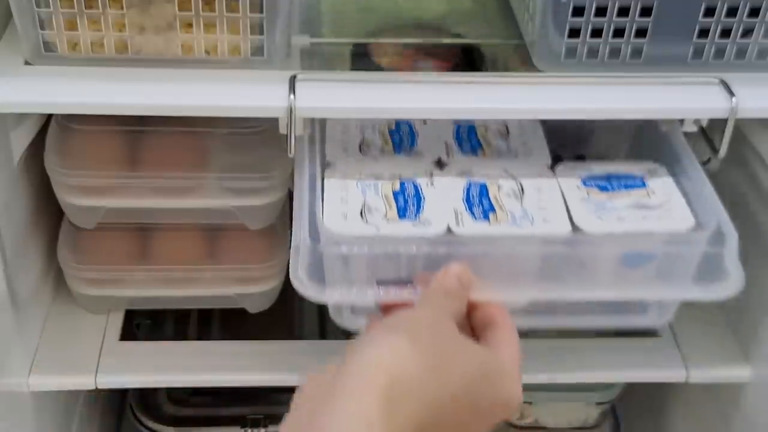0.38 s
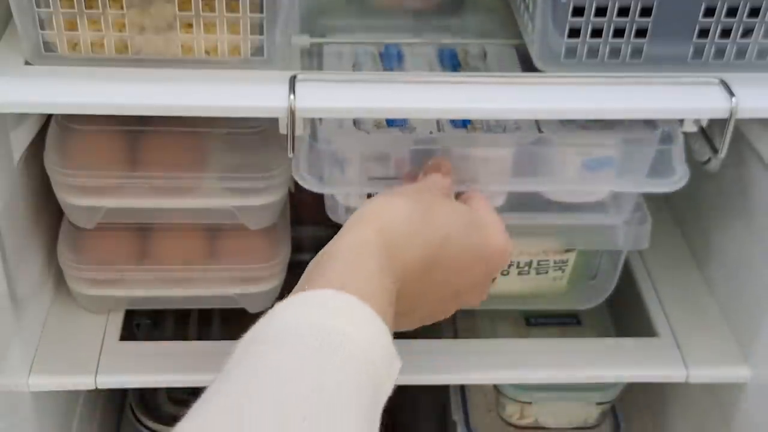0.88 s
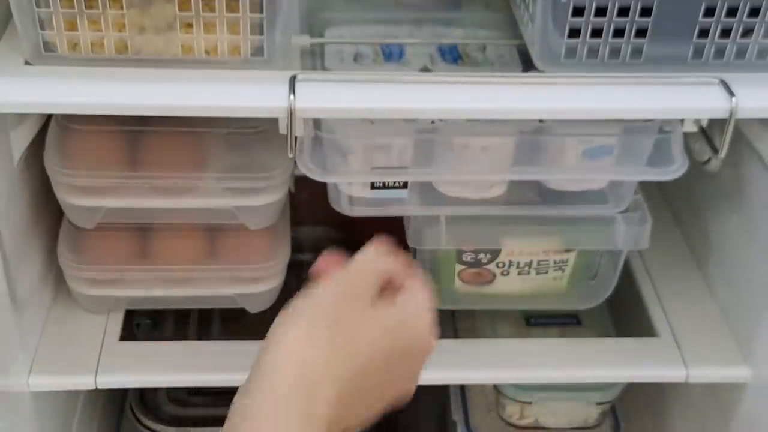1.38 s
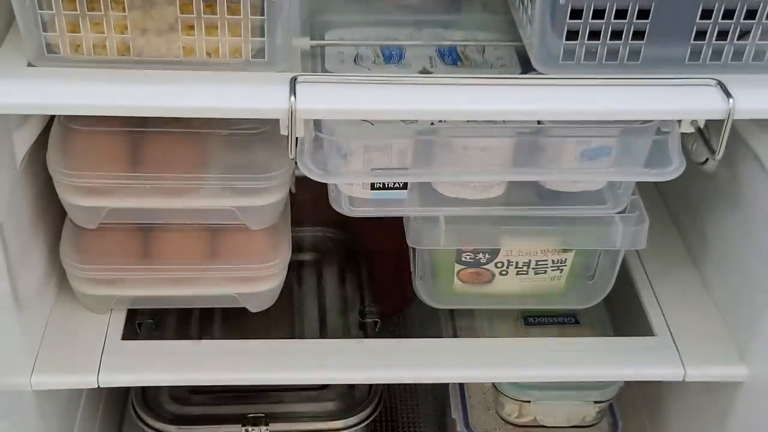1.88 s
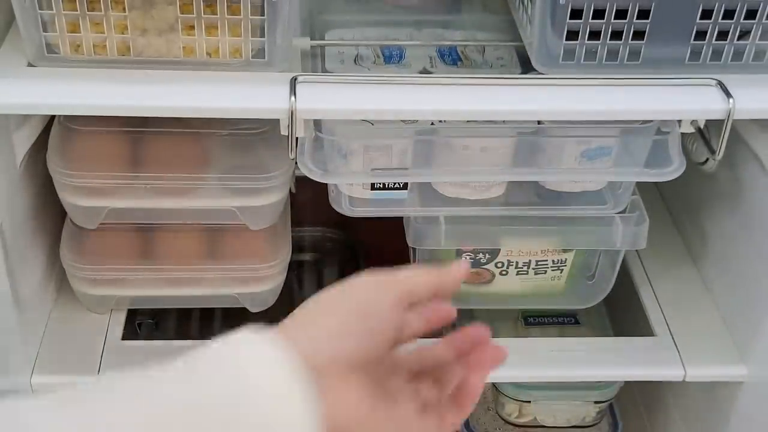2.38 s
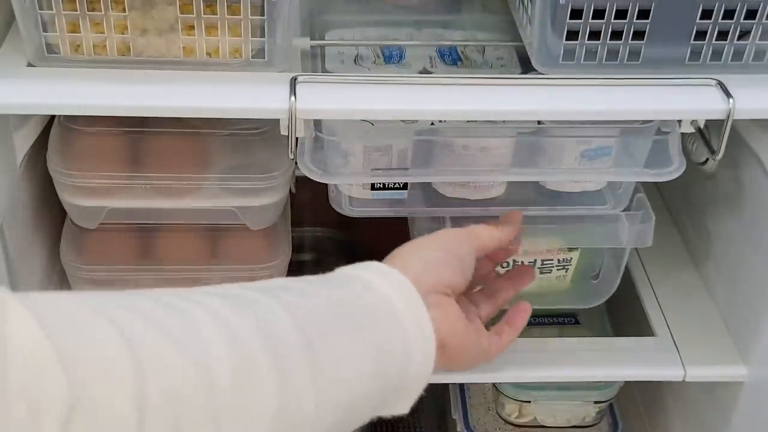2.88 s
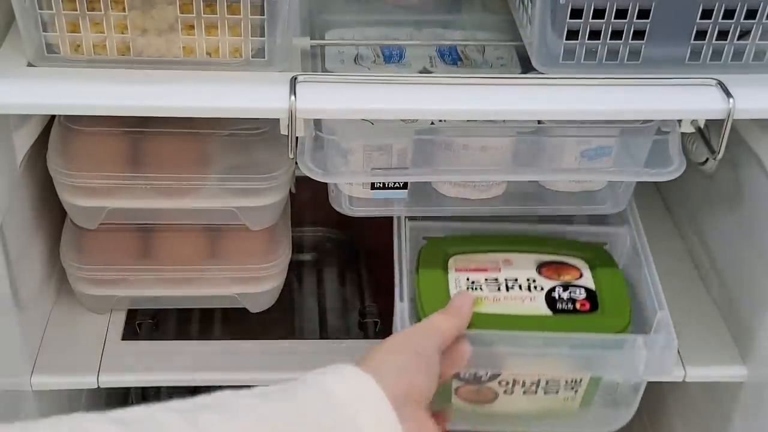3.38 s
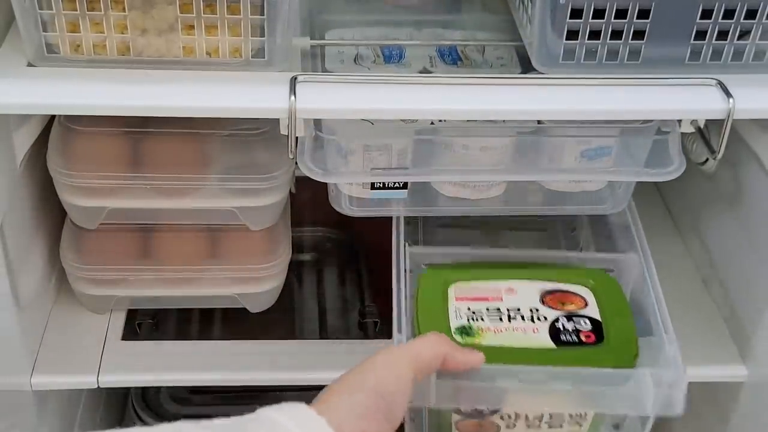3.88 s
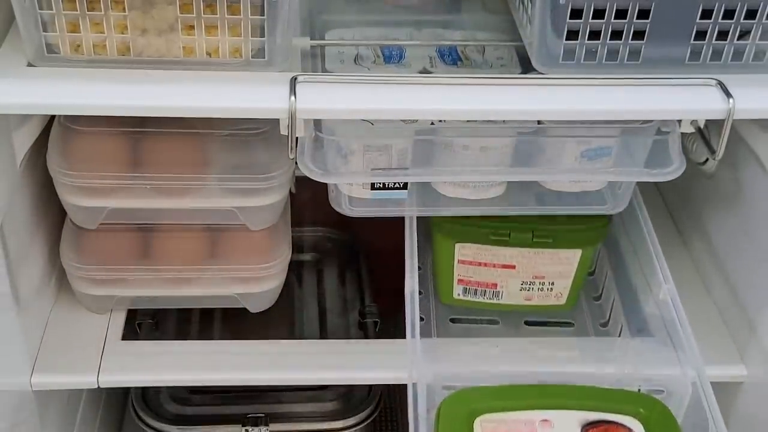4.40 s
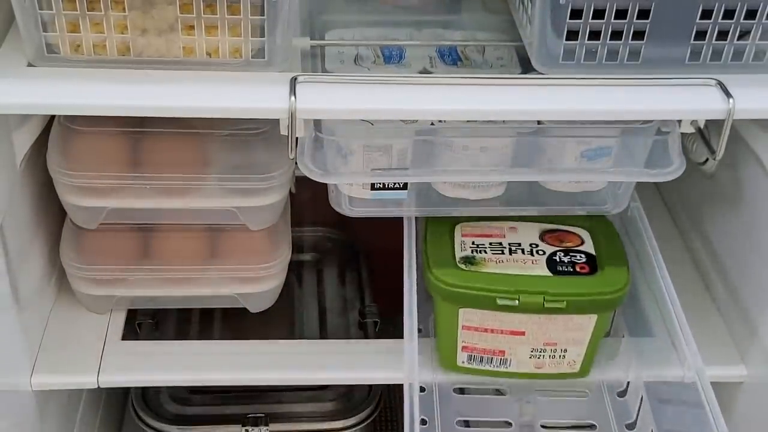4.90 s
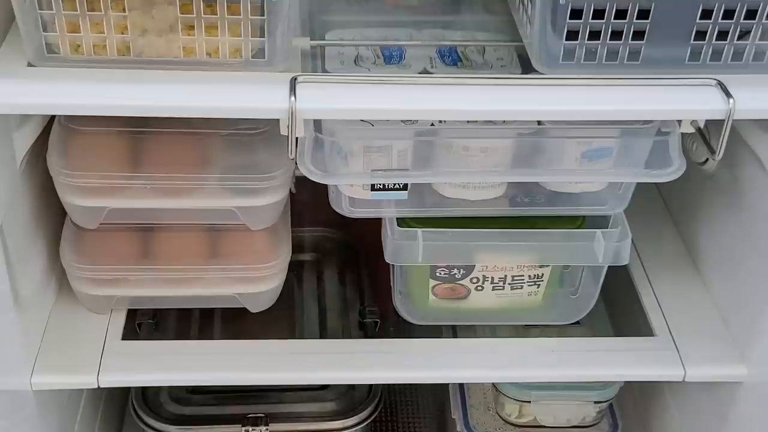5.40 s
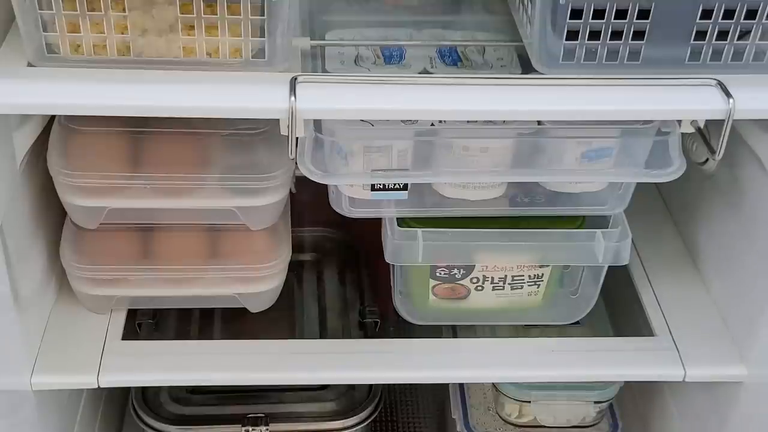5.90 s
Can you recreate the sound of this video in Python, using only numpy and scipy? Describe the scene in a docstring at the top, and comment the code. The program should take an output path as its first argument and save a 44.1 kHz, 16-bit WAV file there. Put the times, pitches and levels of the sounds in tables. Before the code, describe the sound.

Over steady fridge hum, a plastic bin slides in with a bump, then another rattles, bangs hard twice and settles in light taps.

```python
"""Over the steady hum and air noise of a fridge, plastic baskets slide on their rails, close to a two-port
microphone. Fingers tap the rim and the plastic scrapes at once; a faint whistle glides by after 1.5 s. Fresh
knocks come from 2.55 s, the hardest stops thud near 3.06 and 3.92 s, and light taps die out soon after 5.1 s.
Fridge, shaking shelves and scraping are shaped noise (the fridge adds tones), squeaks are narrow-band noise,
and blows ring the basket's modes and echo in a small kitchen. A faint noise band near 9 kHz runs throughout."""
import sys
import numpy as np
from scipy import signal
from scipy.fft import rfft, irfft
from scipy.io import wavfile
from scipy.ndimage import uniform_filter1d

SR = 44100
rng = np.random.default_rng(int(sys.argv[2]) if len(sys.argv) > 2 else 0)


def transcribe(u):
    """Save the signal u as a 16-bit wav file named by the first command-line argument.

    u: samples, shape (n,) or (channels, n), limited to [-1, 1]; the rate is SR.
    q: integer samples, one column per channel.
    """
    v = np.clip(np.atleast_2d(u).T, -1, 1)
    q = np.round(v * 32767).astype(np.int16)
    wavfile.write(sys.argv[1], SR, q)


def boost_factor(decibels):
    """Convert a level in decibels to a linear amplitude factor."""
    exponent = np.asarray(decibels, float) / 20
    return 10 ** exponent


N = 265658  # length in samples


def evened(x):
    """Scales to rms 1."""
    return x / np.sqrt(np.mean(x ** 2) + 1e-20)


def read(points, hz):
    """Reads a table on a log-frequency axis."""
    f, value = np.transpose(points)
    return np.interp(np.log(hz + 1), np.log(f + 1), value)


def add(mix, start_s, sound):
    """Adds a two-channel sound at its start time."""
    part = mix[:, round(start_s * SR):][:, :sound.shape[1]]
    part += sound[:, :part.shape[1]]


def swells(rows, bend, t):
    """Summed gain of swells, and the last column averaged by their strength."""
    peak_s, level_db, rise_s, fall_s, control = np.array(rows).T[:, :, None]
    side_s = np.where(t < peak_s, rise_s, fall_s)
    away = abs(t - peak_s) / np.maximum(side_s, .005)
    gain = boost_factor(np.maximum(level_db - 20 * away ** bend, -200))  # 20 dB down after one rise or fall time
    return gain.sum(0), (gain * control).sum(0) / gain.sum(0)


def swell_curve(rows, bend):
    """The summed swell gain at every sample, drawn in 1 ms steps."""
    ms = np.arange(0, N / SR, .001)
    return np.interp(np.arange(N) / SR, ms, swells(rows, bend, ms)[0])


def noise(size, same, field_db, patchy_db):
    """Two-channel noise from random short-time spectra; field_db(hz, t) gives its colour."""
    hop = size // 4
    frames = N // hop + 5
    hz = np.fft.rfftfreq(size, 1 / SR)
    a, b, c, d, patches = rng.standard_normal((frames, len(hz), 5)).T
    patches = uniform_filter1d(patches, size=6, axis=0)
    patches = evened(uniform_filter1d(patches, size=8, axis=1))
    like = np.clip(read(same, hz), -1, 1)[:, None]
    left = a + 1j * b
    right = like * left + np.sqrt(1 - like ** 2) * (c + 1j * d)
    z = np.array([left, right])
    z *= boost_factor(field_db(hz[:, None], np.arange(frames) * size / 4 / SR) + patchy_db * patches)
    return signal.istft(z, nperseg=size, noverlap=size - hop)[1][:, :N]


# edges of a faint steady noise band: [low_hz, high_hz]
BAND_HZ = [8330, 9300]
BAND_DB = -89  # rms before the final channel trim


def faint_band():
    """A faint steady band of noise near 9 kHz, cut from white noise by a band-pass."""
    band = signal.butter(4, BAND_HZ, "bandpass", fs=SR, output="sos")
    return boost_factor(BAND_DB) * evened(signal.sosfilt(band, rng.standard_normal((2, N))))


# colour of the air noise: (pitch_hz, relative density_db per Hz)
AIR = [(12, -50.5), (20, -27.5), (53, -4), (123, -12), (146, -10), (193, -4), (255, -6), (388, -7.5),
       (590, -10.5), (642, -17.5), (738, -17), (1350, -28), (1750, -26.5), (1900, -32.5), (2390, -38),
       (3100, -43), (3630, -37.5), (4060, -49.5), (7500, -56.5), (12000, -74), (16000, -64)]
# left-right likeness of the air noise: (pitch_hz, likeness 0..1)
AIR_SAME = [(30, .2), (60, 0.67), (180, 1), (550, 0.24), (1650, 0.044), (15000, 0.067)]
# motor and fan tones: (pitch_hz, level_db rms about which they waver, before the final channel trim)
HUM = [(59.6, -62.5), (116, -66), (199.2, -65.5), (358, -72), (745, -77)]
# thin lines of the motor: (pitch_hz, mid-scene level_db rms about which they waver, before the trim)
WHINE = [(3483, -101), (3542, -94), (3601, -98), (3666, -85.5), (3725, -100)]
AIR_DB = -55.5  # rms before the final channel trim
WHINE_SWELL_DB_PER_S = 0.6


def fridge():
    """Broad air noise with slightly wavering motor and fan tones."""
    def field_db(hz, t):
        return read(AIR, hz) + 0 * t
    bed = boost_factor(AIR_DB) * evened(noise(2048, AIR_SAME, field_db, patchy_db=1.2))
    t = np.arange(N) / SR
    for hz, db in HUM:
        drift, waver = uniform_filter1d(rng.standard_normal((2, N)), size=900, axis=1)
        wander = .0008 * hz * np.cumsum(evened(drift)) / SR
        turn = 2 * np.pi * (hz * t + rng.random() + wander)
        offset = [[0], [.5 * rng.standard_normal()]]  # left-right phase, radians
        bed = bed + np.sqrt(2) * boost_factor(db + 0.55 * evened(waver)) * np.sin(turn + offset)
    for hz, db in WHINE:
        waver = evened(uniform_filter1d(rng.standard_normal((2, N)), size=6000, axis=1))
        level_db = db + 1.2 * waver + WHINE_SWELL_DB_PER_S * (t - t.mean())
        bed = bed + np.sqrt(2) * boost_factor(level_db) * np.sin(2 * np.pi * (hz * t + rng.random()))
    return bed


# decay of the small room: (pitch_hz, t60_s)
KITCHEN = [(80, .6), (250, 0.44), (800, 0.35), (4000, 0.076), (12000, 0.15)]
# left-right likeness of the room, shelves, scrape and blows: (pitch_hz, likeness 0..1)
NEAR_SAME = [(30, 0.11), (60, 0.88), (130, 1), (300, 0.92), (480, 0.97), (700, 0.1), (2000, 0.18),
             (12000, 0.06)]


def kitchen(x):
    """Sparse reflections of random sign, one in every 20 samples, each band dying at its own speed."""
    taps = np.zeros((2, SR // 2))
    at = np.arange(200, SR // 2 - 20, 20) + rng.integers(0, 20, (2, (SR // 2 - 201) // 20))
    np.put_along_axis(taps, at, rng.choice([-1., 1.], at.shape), 1)
    hz, t, z = signal.stft(taps, SR, nperseg=512)
    like = np.clip(read(NEAR_SAME, hz), -1, 1)[:, None]
    z[1] = like * z[0] + np.sqrt(1 - like ** 2) * z[1]
    decay = boost_factor(-60 * t / read(KITCHEN, hz)[:, None])
    tail = signal.istft(z * decay, SR, nperseg=512)[1]
    return signal.fftconvolve(x, tail / np.linalg.norm(tail[0]), axes=1)[:, :N]


# corners of a thin high whistle: (time_s, pitch_hz, level_db rms before the final channel trim)
SQUEAK = [(1.52, 13324, -102), (1.612, 15300, -83), (1.75, 13300, -83)]


def squeak():
    """A faint sine whistle gliding near the top of hearing; returns its start and sound."""
    s, hz, db = np.transpose(SQUEAK)
    t = np.arange(s[0], s[-1], 1 / SR)
    tone = np.sin(2 * np.pi * np.cumsum(np.interp(t, s, hz)) / SR)
    tone = tone * signal.windows.tukey(len(t), .2)
    return s[0], np.sqrt(2) * boost_factor(np.interp(t, s, db)) * tone * np.ones((2, 1))


# the shelves shake when a basket jolts, overlapping swells adding up:
# (peak_s, level_db before the final channel trim, rise_s, fall_s, resonance_hz)
JOLTS = [(.062, -49.5, 0.26, 0.13, 99), (.226, -40, 0.075, 0.022, 71), (.42, -37, 0.18, 0.12, 105),
         (.658, -44, 0.073, 0.075, 64), (.957, -29.5, 0.067, 0.038, 112), (.99, -31, 0.039, 0.086, 118),
         (1.05, -50, 0.13, 0.11, 111), (2.788, -45, 0.047, 0.06, 60.7), (2.936, -38, 0.23, 0.082, 60),
         (3.02, -41.5, 0.052, 0.062, 68), (3.08, -27.5, 0.024, 0.075, 109.4),
         (3.126, -24, 0.066, 0.078, 124), (3.256, -40, .2, 0.068, 77.2), (3.42, -45.5, 0.57, 0.23, 55.5),
         (3.668, -38.5, 0.013, 0.19, 66), (3.96, -21.5, 0.074, 0.061, 100),
         (4.055, -44.5, 0.13, 0.068, 101), (4.918, -47.5, 0.031, .1, 111.2),
         (5.025, -50, 0.081, .05, 122.2)]
JOLT_BEND = 0.92  # 1 = steady dB slope, 2 = rounded top


def shelves():
    """Low uneven shaking of the shelves and walls around a resonance that shifts with the load."""
    def field_db(hz, t):
        octaves = np.log2((hz + 1) / swells(JOLTS, JOLT_BEND, t)[1])
        skirts = np.minimum(14 * octaves ** 2, 12 + 9 * abs(octaves))
        return -skirts - 12 * np.maximum(octaves, 0)
    shake = noise(2048, NEAR_SAME, field_db, patchy_db=4.5)
    local = np.sqrt(uniform_filter1d((shake ** 2).mean(0), size=2000))  # the shaking is sustained
    return shake / local * swell_curve(JOLTS, JOLT_BEND)


# basic colour of the rubbing: (pitch_hz, relative density_db per Hz)
RUB = [(180, -32), (300, -2), (418, 6.5), (470, -17.5), (737, 1), (915, -16), (1040, -7.5), (1390, -10.5),
       (1610, -8), (2280, -13.5), (3460, -9), (9090, -16), (16000, -28.5)]
# rubbing on the rails swells and dies, overlapping swells adding up; level is nominal for 2.5-12 kHz:
# (peak_s, level_db before the final channel trim, rise_s, fall_s, dullness_db tilted in below about 2 kHz)
SLIDES = [(.05, -56, 0.71, 0.43, -1.5), (.27, -51.5, 0.045, 0.28, -15), (.38, -46.5, .15, 0.29, -7),
          (.56, -58, .2, .13, -4), (.9, -59.5, .13, 0.063, 2), (.97, -60, 0.062, 0.088, 17.5),
          (1.73, -76.5, .3, 0.31, 4.5), (1.87, -74, 0.089, 0.063, -13.5), (2.33, -83.5, 0.14, 0.24, 13.5),
          (2.59, -52.5, 0.041, 0.053, -2), (2.98, -71, 0.63, 0.18, -4.5), (3.09, -47.5, 0.05, .12, 13.5),
          (3.2, -64.5, 0.16, 0.32, 3.5), (3.42, -54.5, 0.12, 0.078, -5), (3.49, -61, 0.051, .025, -2.5),
          (3.66, -81, .022, 0.07, -13), (3.85, -66, 0.08, .12, 7), (3.93, -41, 0.039, 0.13, -2.5),
          (4.05, -61.5, .12, 0.22, 2), (4.75, -66.5, 0.34, 0.12, -6.5), (4.91, -79.5, 0.22, 0.071, 9.5)]
SLIDE_BEND = 1.48  # 1 = steady dB slope, 2 = rounded top
FAINT_DB, TOP_HZ = -77.5, 12000  # when the swell gain sinks past the first, the top above the second is cut


def scrape():
    """Dense friction noise on the rails, coloured by the plastic; tiny catches roughen the level."""
    def field_db(hz, t):
        gain, dull_db = swells(SLIDES, SLIDE_BEND, t)
        faint = 1 / (1 + (gain / boost_factor(FAINT_DB)) ** 4)
        top = 1 / (1 + (TOP_HZ / (hz + 1)) ** 24)
        # the basket's modes colour the rubbing
        ringing = sum(1 / (1 + (2 * (hz - f) / (width + 90)) ** 2) for f, width, _ in BASKET)
        dull = dull_db / (1 + (hz / 2000) ** 2)
        return read(RUB, hz) + 5 * np.minimum(ringing, 1) + dull - 25 * faint * top
    band = signal.butter(4, [2500, 12000], "bandpass", fs=SR, output="sos")
    rub = noise(256, NEAR_SAME, field_db, patchy_db=1.6)
    rub /= np.std(signal.sosfilt(band, rub.mean(0)))
    catches = (rng.random(N) < 1500 / SR) * rng.exponential(.12, N)  # about 1500 a second
    rough = 1 + signal.lfilter([1], [1, -np.exp(-1 / (0.0026 * SR))], catches)  # 2.6 ms time constant
    return rub * evened(rough) * swell_curve(SLIDES, SLIDE_BEND)


def chirp(length_s, pitch_hz, width_hz, level_db):
    """Friction noise through one narrow resonance."""
    edges = [pitch_hz - abs(width_hz) / 2, pitch_hz + abs(width_hz) / 2]
    band = signal.butter(2, edges, "bandpass", fs=SR, output="sos")
    size = round(np.clip(length_s, .005, .2) * SR)
    rub = signal.sosfilt(band, rng.standard_normal((2, SR // 4)))[:, -size:]
    both = evened(rub + .5 * rub[::-1])  # each side shares half of the other
    return boost_factor(level_db) * both * signal.windows.tukey(size, .4)


# short squeaks of plastic rubbing on one resonance:
# (start_s, length_s, pitch_hz, width_hz, level_db rms before fades and the final channel trim)
CHIRPS = [(0.128, 0.15, 3300, 250, -64), (0.204, 0.03, 3300, 300, -59), (0.234, 0.03, 1570, 151, -54),
          (.42, .05, 2550, 120, -55), (0.462, 0.015, 1920, 120, -56), (0.505, 0.075, 747, 90, -52.5),
          (0.591, 0.026, 1780, 120, -58), (2.559, 0.053, 1495, 80, -47), (2.553, .05, 1830, 120, -49.5),
          (2.65, 0.014, 3100, 200, -56), (2.826, .018, 2810, 250, -51), (2.949, 0.049, 1430, 400, -62.5),
          (3.395, 0.054, 1716, 309, -57), (4.149, 0.028, 3720, 150.5, -60), (4.56, 0.033, 3580, 151, -76),
          (4.598, 0.066, 1794, 45, -70.5), (4.606, 0.047, 1226, 35, -68), (4.721, .022, 1210, 100, -69),
          (4.69, 0.094, 2850, 130, -74)]


def chirps():
    """Places each short plastic squeak at its time."""
    track = np.zeros((2, N))
    for start_s, *row in CHIRPS:
        add(track, start_s, chirp(*row))
    return track


# modes of the basket: (nominal pitch_hz, width_hz, relative level_db)
BASKET = [(92.7, 25, -7.5), (112, 19, -3), (202, 24, 2), (256.6, 35, 1), (300, 30, -1.5), (380, 53, 1.5),
          (429, 33, 0.5), (549.8, 61, 2), (591.8, 25, 0.5), (640, 45, -3.5), (720, 31, -2), (800, 35, -4.5),
          (1040, 35, -3.5), (1147, 47, 0), (1216, 56, -1.5), (1364, 32, -6.5), (1500, 60, -4),
          (1832, 43, -4.5), (2052, 66, -10.5), (2450, 48, -15.5), (2747, 70, -7.5), (2920, 160, -12),
          (3068, 70, -8), (3640, 90, -8), (4620, 150, -13), (5000, 180, -13)]
# colour of the contact snap: (pitch_hz, relative density_db per Hz)
CRACK = [(350, -33.5), (600, -3), (1330, -1), (1980, -6), (3160, -8), (4110, -13), (5300, -13.5),
         (6300, -17.5), (10500, -27.5), (12900, -28), (16000, -36)]
RING_S, RING_LONGER_PER_DB = 0.06, 0.012  # t60 at a -19.5 dB knock; softer contacts damp the basket less
SPOT_OCTAVES = .28  # reach of the struck spot


def blow(knock_db, thud_db, click_db, spot_hz):
    """A brief contact rings the basket's modes, shifted by load and place, and snaps in the treble."""
    t = np.arange(SR // 3) / SR
    hz, width, db = np.array(BASKET).T[:, :, None]
    low, high = hz < 550, hz > 2200
    chance = rng.standard_normal((4, len(BASKET), 1))
    hz = hz * (1 + .008 * chance[3])
    like = np.clip(read(NEAR_SAME, hz), -1, 1)
    left = boost_factor(2.0 * chance[0]) * np.exp(2j * np.pi * chance[1])
    lag = 1.5 * np.arccos(like) * np.tanh(chance[2])  # the ports differ in phase, radians
    ports = np.array([left, left * np.exp(1j * lag)])
    db = db + 10.0 * np.exp(-(np.log2(hz / spot_hz) / SPOT_OCTAVES) ** 2)  # the spot favours nearby modes
    t60 = np.clip(RING_S * (1 - RING_LONGER_PER_DB * (knock_db + 19.5)), .01, .3)
    ring_s = t60 * np.clip(45 / width, .3, 1.25)  # narrow modes ring longer
    rise = 1 - np.exp(-t / (0.0017 + 0.26 / hz))  # the bass builds up over about a cycle
    modes = (ports * np.exp(2j * np.pi * hz * t)).real * boost_factor(db - 60 * t / ring_s) * rise
    thud, knock, tick = ((modes * part).sum(1) for part in (low, ~low & ~high, high))
    bins = np.fft.rfftfreq(len(t), 1 / SR)
    halves = np.array([bins < 2200, bins >= 2200])[:, None]
    colour = boost_factor(read(CRACK, bins)) * halves
    rattle, hiss = irfft(rfft(rng.standard_normal((2, len(t)))) * colour, len(t))
    fade = boost_factor(-60 * t / 0.035) + 0.52 * boost_factor(-60 * t / (2.0 * t60))  # a short snap and a second decay
    fade = fade * (1 - np.exp(-t / 0.00076))
    thud = thud / abs(thud).max()
    knock = knock / abs(knock).max() + 0.31 * evened(rattle) * fade  # contents rattle between the modes
    click = 0.75 * tick / abs(tick).max() + 0.69 * evened(hiss) * fade
    return boost_factor(knock_db) * (boost_factor(thud_db) * thud + knock + boost_factor(click_db) * click)


# blows on the basket, levels before the rattle, the room and the final channel trim:
# (start_s, knock_db, thud_db over the knock, click_db over the knock, spot_hz favoured by the struck spot)
BLOWS = [(0.035, -33.5, -4.5, -11, 1830), (0.317, -34.5, -14, -7.5, 653), (0.372, -21.5, -11, -14, 1900),
         (.386, -32.5, 2.5, -5, 2670), (0.552, -43, -4, -15, 750), (0.916, -30.5, -0.5, -14, 980),
         (0.94, -31.5, 4, -13.5, 720), (0.952, -32.5, -4, -17, 620), (0.984, -38, 3.5, -3, 1500),
         (.995, -34, -3, -12.5, 724), (1.21, -60.5, 7, -13, 617), (2.55, -31, -8.5, -4.5, 1670),
         (2.648, -33.5, -10, -8, 1050), (2.692, -36.5, -13, -11.5, 1025), (2.7401, -35.5, -5.5, -4, 3040),
         (2.746, -29, -7, -21, 581), (2.78, -34, -1.5, -11.5, 377), (2.8188, -29.5, -13.5, -7, 2960),
         (2.825, -27.5, -4, -19, 1050), (2.839, -35.5, 4.5, -19.5, 580), (2.901, -64.5, -2.5, 1, 4430),
         (3.0565, -12.5, -6, -4, 810), (3.0594, -19.5, 11, -5, 388.3), (3.071, -19, 6, -16.5, 216),
         (3.086, -26, 10, -14, 380), (3.111, -20, 2.5, -7.5, 197), (3.124, -23.5, 6, -12, 200),
         (3.395, -43.5, -4, -15, 334), (3.482, -49, -10, 0.5, 376), (3.642, -55.5, 3.5, -14, 600),
         (3.842, -34.5, 0, -5.5, 302.4), (3.913, -27, -9, -8.5, 1190), (3.92, -9.5, -4, -5, 1179),
         (3.927, -18, 8.5, -8, 300), (3.938, -20.5, 5.5, -9, 450), (3.947, -12.5, -4.5, -4.5, 1947),
         (3.953, -24, 9.5, -12, 240), (4.002, -40, 4, -15, 233), (4.088, -45, 4.5, -32, 210),
         (4.706, -50.5, 2, -22, 1170), (4.778, -35.5, -4, -3, 2350), (4.788, -39.5, 1, -14, 800),
         (4.88, -54.5, -1, -7.5, 5000), (4.906, -52.5, 10.5, -32, 335), (5, -56, 15.5, -12, 309),
         (5.102, -62, 5, -10, 345)]


def blows():
    """Places each tap, knock and stop at its time, without the room."""
    hits = np.zeros((2, N))
    for start_s, *row in BLOWS:
        add(hits, start_s, blow(*row))
    return hits


def scene():
    """Blows ring in the room; rubbing, shaking, squeaks, the fridge and the faint band are added."""
    near = faint_band() + fridge() + shelves() + scrape() + chirps()
    add(near, *squeak())
    hits = blows()
    mix = hits + boost_factor(-11.5) * kitchen(hits) + near
    return mix * boost_factor([[.4], [-.4]])  # channel trim: left up, right down


def top_cut(x):
    """Nothing passes above the cut-off."""
    return signal.sosfilt(signal.butter(12, 16470, fs=SR, output="sos"), x)


def record(dry):
    """Limits the band with a steep linear-phase low-pass at 15830 Hz."""
    edge = signal.firwin(511, 15830, window=("kaiser", 9), fs=SR)
    finished = signal.oaconvolve(dry, edge[None], "same")
    return top_cut(finished)


dry = scene()
out = record(dry)
transcribe(out)
```